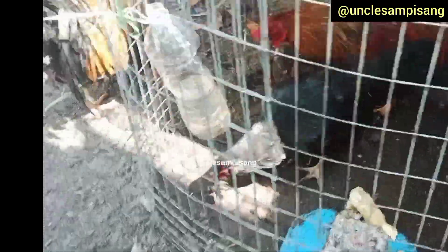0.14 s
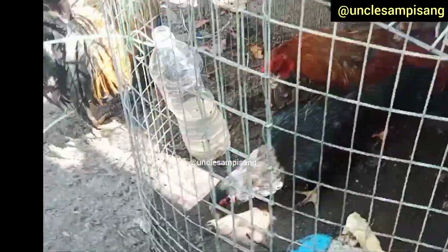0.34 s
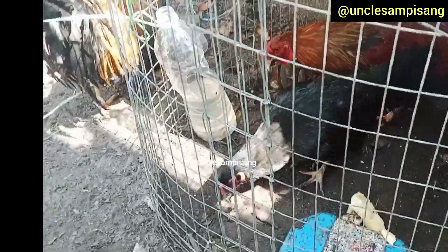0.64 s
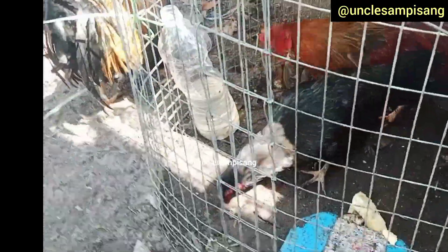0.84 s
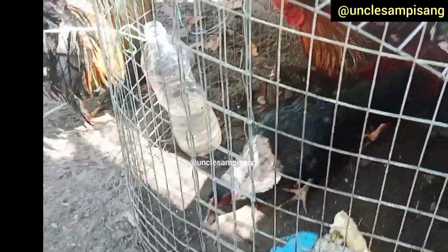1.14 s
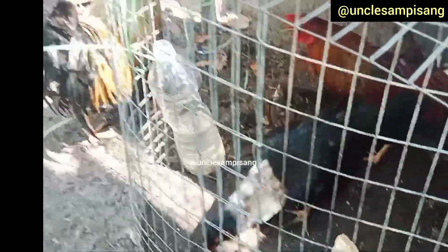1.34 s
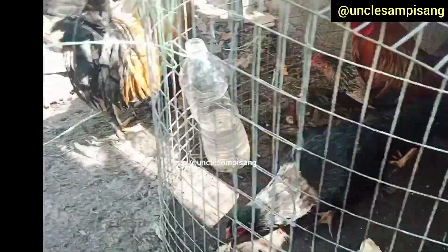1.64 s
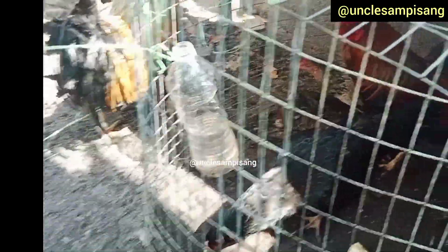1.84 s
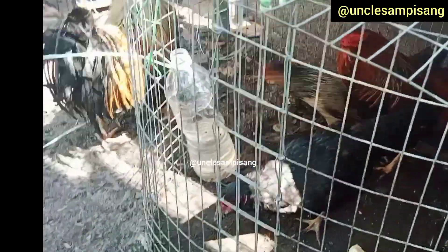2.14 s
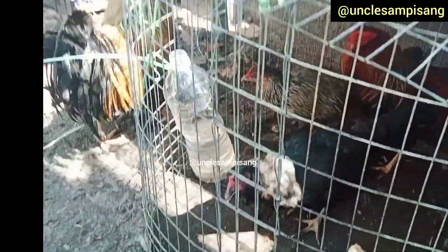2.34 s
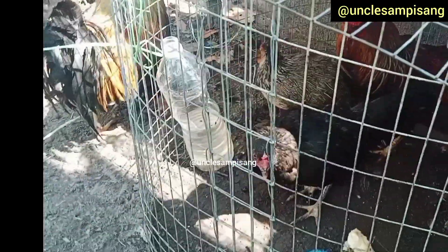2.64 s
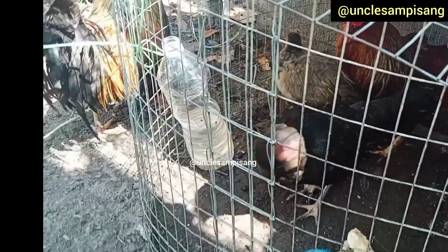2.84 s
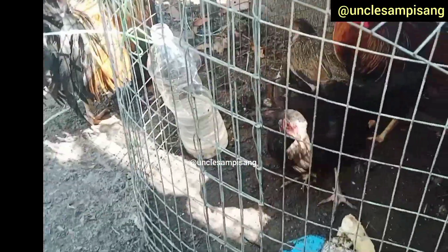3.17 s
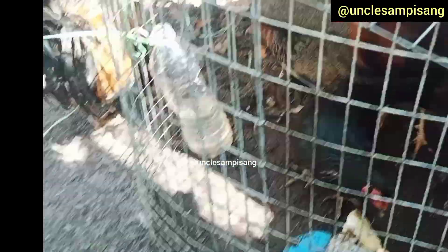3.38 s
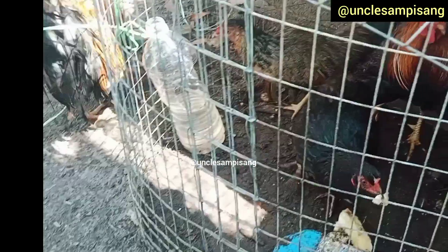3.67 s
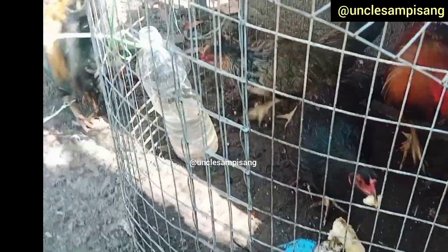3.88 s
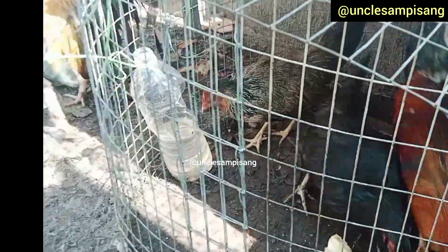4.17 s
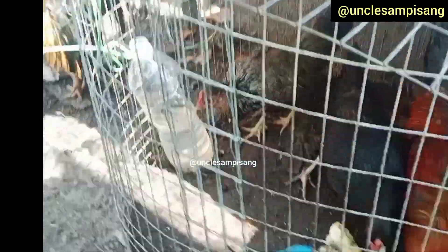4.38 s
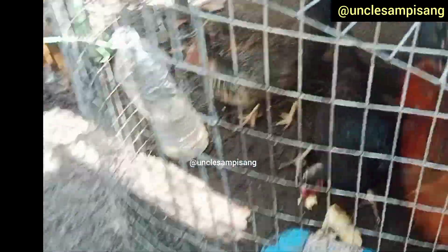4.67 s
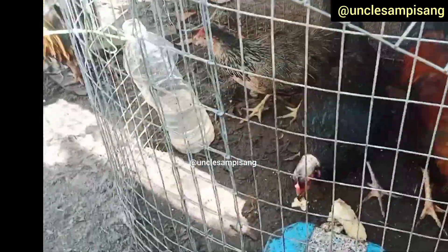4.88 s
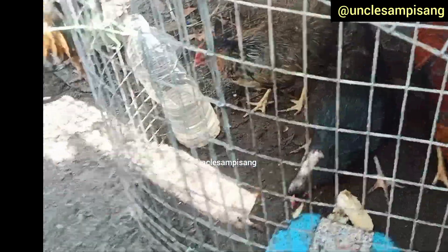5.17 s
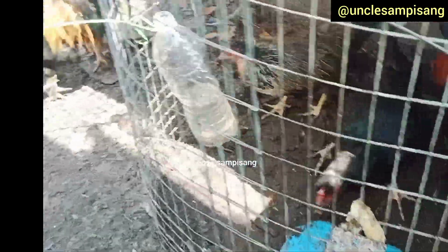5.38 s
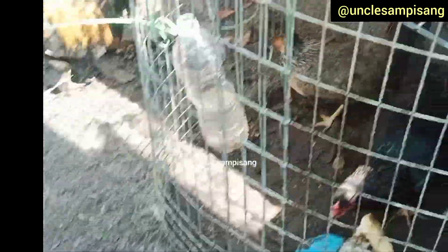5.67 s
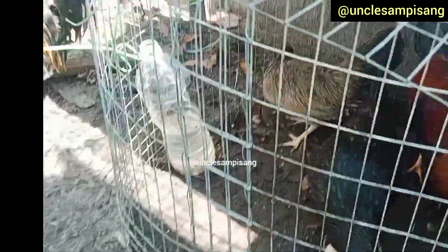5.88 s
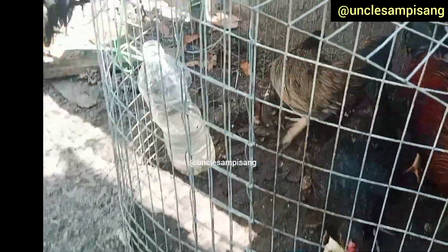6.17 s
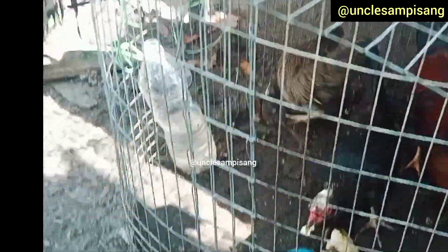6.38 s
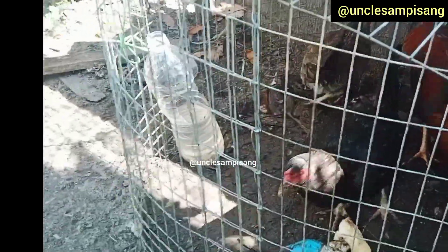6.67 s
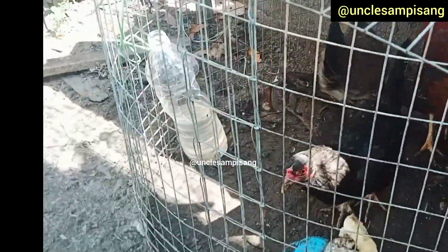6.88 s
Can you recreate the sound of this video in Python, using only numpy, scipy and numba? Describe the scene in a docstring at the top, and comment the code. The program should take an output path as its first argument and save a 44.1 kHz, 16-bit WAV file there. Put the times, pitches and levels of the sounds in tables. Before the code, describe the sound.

Quick, throaty rooster clucks come in runs with brief pauses, over light pecking and faint outdoor air.

```python
"""In a yard, a rooster clucks in quick runs inside a wire pen, about a metre away.
Each cluck comes from flapping membranes in his windpipe: it starts as a creak, tightens into a short
arch of pitch and rings in his throat, chest and beak. Beaks knock and tick on food and ground, feet stir
litter and grit, hens and far-off chicks call faintly, and at the end a chick peeps over a rustle.
The yard answers with a soft echo, over a faint hush of outdoor air."""
import sys
import numpy as np
from scipy import signal
from scipy.fft import rfft, irfft
from scipy.io import wavfile
from scipy.ndimage import uniform_filter1d, minimum_filter1d
from numba import njit

SR = 44100
rng = np.random.default_rng(int(sys.argv[2]) if len(sys.argv) > 2 else 0)


def digitize_waveform(pressure):
    """Quantize a signal to 16-bit integers and store it at the path in sys.argv[1].

    Rows of a 2-D input are taken as channels; values are limited to [-1, 1].
    """
    field = np.atleast_2d(pressure).T
    bounded = np.clip(field, -1, 1)
    quanta = np.round(bounded * 32767).astype(np.int16)
    wavfile.write(sys.argv[1], SR, quanta)


N = 309582

# birds' feet stirring the litter and scratching the grit: start_s, length_s, rustle_db, grit_db
FOOT_STIRS = [(-0.004, 0.9, -57.5, -70.5), (3.607, 0.37, -75, -82), (4.245, .3, -67, -71),
              (4.6, 0.99, -58, -72), (6.919, 0.42, -36.5, -68)]


def rooster(gain_db=-0.3, wall_delay_s=0.022, wall_db=-25):
    """Runs of clucks. Each bounces off ground and pen, differently as the head bobs, and off a wall."""
    # the clucks, timed from the start of their creak: start_s, creak_s, loud_s, pitch_hz, level_db
    clucks = [(.1, .012, 0.025, 419, -22.3), (.251, .011, 0.025, 508.3, -20),
              (0.419, 0.015, .03, 493.4, -22), (1.086, 0.0054, 0.032, 374, -23),
              (1.267, 0.0087, 0.028, 377.6, -23), (1.434, 0.0066, .026, 470, -21.7),
              (1.597, .007, 0.024, 404.8, -20), (1.748, 0.014, 0.023, 398, -20.5),
              (1.951, .014, 0.023, 477.5, -19), (2.117, .013, 0.026, 400.5, -16.5),
              (2.299, .012, 0.037, 526.5, -15.5), (2.49, 0.011, 0.035, 397.3, -19.5),
              (2.766, 0.013, 0.034, 486.3, -18), (2.921, .012, 0.034, 412, -18.5),
              (3.159, .007, 0.0286, 430.8, -26.5), (3.386, 0.0046, 0.03, 367.7, -39),
              (3.905, .01, 0.031, 360.5, -26), (4.059, 0.011, 0.026, 482, -18),
              (4.223, 0.008, 0.026, 538, -17), (4.371, 0.015, 0.028, 510.7, -17.5),
              (4.526, 0.0089, .03, 523.8, -17.5), (4.686, .012, 0.027, 509.2, -18),
              (4.879, .015, .034, 533, -19), (5.035, .014, 0.036, 533.8, -19.5),
              (5.255, .015, 0.035, 529.2, -17.5), (5.45, 0.01, 0.032, 541.7, -15.5),
              (5.683, 0.013, 0.02, 503, -16), (5.846, 0.015, 0.022, 525.3, -17),
              (6.013, 0.015, 0.032, 533.5, -20.3), (6.205, 0.019, 0.023, 529.3, -15.5),
              (6.478, .014, 0.027, 539, -19.5), (6.636, 0.012, 0.029, 501, -22.5),
              (6.8, 0.017, 0.023, 499.7, -15.5), (6.967, 0.016, .029, 495.8, -16)]
    # where the throat rings for a 500 Hz cluck, higher in the later runs: time_s, ring_hz
    throat_tuning = [(.3, 966), (2, 958), (3, 992), (4.05, 1001), (4.25, 1075), (7, 1051)]
    # the beak opens and closes, moving the pitches it rings at: time_s, pitch_factor
    beak_shifts = [(.3, 1.03), (1.3, 1.03), (2.1, .965), (2.95, .97), (3.2, 1.02), (4.55, .965),
                   (4.9, 1.06), (5.3, 1.01), (6.3, .98)]
    # treble and nasal ring compared with the throat: time_s, treble_db, nasal_db
    brightness = [(.1, -12, -20), (.25, -9.5, -8), (1.09, -8, -9.5), (1.3, -14.5, -9), (1.95, -7.5, -9.5),
                  (2.12, -16, -16.5), (2.5, -14, -11), (2.93, -16, -11), (3.39, -24.5, -26),
                  (3.91, -17.5, -21.5), (4.06, -10.5, -16.5), (4.37, -12.5, -13.5), (4.53, -8.5, -7.5),
                  (5.04, -8.5, -12), (5.45, -14.5, -17.5), (6.01, -18, -25.5), (6.64, -9, -35),
                  (6.97, -13, -32)]
    # dips and bumps in the tone of the voice: frequency_hz, gain_db
    voice_tone = [(530, 0.5), (620, 4), (760, 2), (1500, -3), (1700, -7.5), (2000, 1.5), (4800, -3.5),
                  (5300, -14.5), (7500, -10.5), (8200, -2.5), (9200, -1), (10000, -9.5), (13000, -9)]
    out = np.zeros(N)
    bounce_delays_s = rng.uniform([.001, .0025], [.0025, .0045], (len(clucks), 2))
    for (start_s, creak_s, loud_s, pitch_hz, level_db), delays_s in zip(clucks, bounce_delays_s):
        throat_hz = look_up(throat_tuning, start_s) * (pitch_hz / 500) ** 0.25  # rises with the pitch
        beak_shift = look_up(beak_shifts, start_s)
        treble_db, nasal_db = look_up(brightness, start_s), look_up(brightness, start_s, column=2)
        voice = cluck(creak_s, loud_s, pitch_hz, level_db, throat_hz, beak_shift, treble_db, nasal_db)
        begin_s = start_s - 2 / pitch_hz  # one slow flap of run-up
        add(out, begin_s, voice)
        bounce = colour(voice, [(1050, -24), (1600, -7), (9000, -6)])
        for delay_s in delays_s:
            add(out, begin_s + delay_s, bounce)
        add(out, begin_s + wall_delay_s, undb(wall_db) * voice)
    return undb(gain_db) * colour(out, voice_tone)


def cluck(creak_s, loud_s, pitch_hz, level_db, throat_hz, beak_shift, treble_db, nasal_db):
    """One cluck: tension lifts the pitch until its first overtone sits where the throat rings."""
    # soft clucks are hoarse, hard ones cleaner: level_db, roughness (0 to 1)
    hoarseness = [(-22.5, .62), (-17.5, .47), (-14.5, .25)]
    # a dip just above the throat's ring, which the nasal ring fills: frequency_hz, gain_db
    nasal_dip = [(1270, -0.5), (1500, -6), (2100, -0.5)]
    # where the chest rings: centre_hz, width_hz, gain_db
    chest_rings = [(212.5, 31.6, -3.5), (330.7, 107, 2.5), (401.2, 15, -8), (568, 72, 1)]
    # chest hum compared with the throat, weaker in hard clucks: level_db, chest_db
    chest_share = [(-27, -15.5), (-15, -21)]
    t = np.arange(SR // 10) / SR - 2 / pitch_hz
    progress = (t - creak_s) / loud_s  # below 0 the creak, 0 to 1 the loud part
    tension = np.interp(progress, [-0.3, 0.21, 0.4915, 1.1, 1.15], [0.02, .78, 1, 0.93, 1.0])
    # the effort jumps out of the creak, swells, holds, sags and is cut off
    effort = undb(np.interp(progress, [-.25, 0, .53, .69, 1.1], [-13, -3, 0, 0, -7])) * (progress < 1.1)
    effort *= undb(np.interp(t, [t[0], 0], [-28, 0]))  # the first flap is weak
    roughness = look_up(hoarseness, level_db)
    unrest = np.clip(roughness + 0.18 + 0.97 * (1 - tension), 0, 1)
    pulses, hiss = voice_box(pitch_hz * (.5 + .5 * tension), unrest)
    airflow = effort * (pulses + roughness * hiss)
    rasp = pulses + (0.27 + roughness) * hiss
    # the half-closed beak keeps the ring low in the creak, and opens with the tension
    centre_hz = throat_hz * (0.83 + 0.14 * tension)
    creak = resonate(airflow * (1 - tension), centre_hz, width_hz=390)
    tone = resonate(airflow * tension, centre_hz, width_hz=300)
    throat = colour(creak + tone, nasal_dip)
    chest = sum(undb(db) * resonate(airflow, hz, width_hz) for hz, width_hz, db in chest_rings)
    treble = beak_ring(rasp, effort, beak_shift * (1 + 0.072 * (tension - .92)), treble_db)
    nasal = resonate(effort ** 1.34 * rasp, 1335 * (throat_hz / 950) ** 0.53, width_hz=250)
    voice = unit(throat) + undb(look_up(chest_share, level_db)) * unit(chest)
    voice += undb(nasal_db) * unit(nasal) + undb(treble_db) * unit(treble)
    return undb(level_db) * np.sqrt(loud_s / t[-1]) * voice  # the root allows for the silent end


def voice_box(pitch_hz, unrest, jitter_cycles=0.1103, shimmer_db=2, limp_db=2.5, air=0.14, count=64):
    """Each membrane flap gives a pulse and a hiss. Unrest makes flaps uneven, strong and weak by turns."""
    n = len(pitch_hz)
    samples, flaps = np.arange(n), np.arange(count)
    cycles = np.cumsum(pitch_hz) / SR
    lateness, strength = rng.standard_normal((2, count))
    flap_unrest = np.interp(np.interp(flaps + 0.07, cycles, samples), samples, unrest)
    positions = np.interp(flaps + 0.2138 + jitter_cycles * flap_unrest * lateness, cycles, samples)
    sizes = undb(flap_unrest * (shimmer_db * strength + limp_db * (-1) ** flaps))
    # spread each pulse over 16 samples, so that its centre can fall between two
    nearby = positions.astype(int)[:, None] + np.arange(-7, 9)
    offset = nearby - positions[:, None]
    shapes = sizes[:, None] * np.sinc(offset) * np.sinc(offset / 8)
    pulses = np.bincount(np.maximum(nearby, 0).ravel(), shapes.ravel())[:n]
    hiss = air * np.exp(-(cycles % 1) / 1.2) * rng.standard_normal(n)
    return pulses, hiss


def beak_ring(rasp, effort, pitch_factor, treble_db, stray_share=0.04, stray_db=3):
    """Windpipe and beak ring high only under pressure; the beak's shape differs a little each time."""
    # where windpipe and beak ring: centre_hz, width_hz, gain_db
    rings = [(2039, 180, -4), (2386, 190, 2.5), (2845, 406, 3.5), (3420, 184, -4), (4227, 360, -10),
             (6400, 1000, -23.5), (8540, 590, -20), (14000, 2900, -40)]
    out = 0
    for (hz, width_hz, db), (hz_draw, db_draw) in zip(rings, rng.uniform(-1.05, 1, (len(rings), 2))):
        octaves = np.log2(hz / 2000)
        pressure = effort ** (1.34 + 0.21 * octaves)  # higher rings need more effort
        tilt_db = 0.27 * (treble_db + 12) * octaves  # dull clucks lose the top first
        centre_hz = hz * pitch_factor * (1 + stray_share * hz_draw)
        out += undb(db + tilt_db + stray_db * db_draw) * resonate(pressure * rasp, centre_hz, width_hz)
    return out


def feeding(attack_s=0.0013):
    """Pecks thud on packed earth as two fading tones; grit ticks as short bursts of noise."""
    # dull pecks on the ground: start_s, level_db, pitch_hz, decay_s
    pecks = [(3.068, -28.5, 353, 0.0061), (3.726, -58, 575, 0.0089), (5.523, -29.5, 570, 0.0045),
             (5.531, -28.5, 337, 0.0029)]
    # dry ticks of beak and claw on grit: start_s, level_db, centre_hz, decay_s
    ticks = [(.17, -50.5, 5000, 0.0013), (.347, -59, 5500, .0022), (0.831, -66.5, 4950, 0.0067),
             (1.355, -60, 12000, .0044), (1.394, -63, 10800, .0017), (3.067, -41, 1850, 0.0078),
             (3.351, -59.5, 1895, 0.031), (3.471, -50.5, 2030, .019), (3.478, -54, 9200, .0035),
             (4.131, -63.5, 10000, .002), (4.615, -68, 11100, .002), (5.09, -40, 9900, .0017),
             (6.418, -65, 3800, .006)]
    out, t = np.zeros(N), np.arange(SR // 10) / SR
    for start_s, db, hz, decay_s in pecks:
        thud = np.sin(2 * np.pi * hz * t) + 0.57 * np.sin(2 * np.pi * 1.6 * hz * t)
        envelope = np.exp(-t / decay_s) * (1 - np.exp(-t / attack_s))
        add(out, start_s, undb(db) * 2 * thud * envelope)
    for start_s, db, hz, decay_s in ticks:
        tick = unit(resonate(rng.standard_normal(len(t)), hz, 0.85 * hz))
        add(out, start_s, undb(db) * tick * np.exp(-t / decay_s))
    return out


def chick(top_s=6.937, rise_s=0.035, fall_s=0.081, start_hz=4160, top_hz=6550, end_hz=4150):
    """A chick's peep: a whistle that leaps up and slides down."""
    t = np.arange(N) / SR - top_s
    rising_hz = start_hz + (top_hz - start_hz) * np.exp(-(t / 0.015) ** 2)
    falling_hz = end_hz + (top_hz - end_hz) * np.exp(-np.abs(t) / 0.024)
    pitch_hz = np.where(t < 0, rising_hz, falling_hz) * (1 + 0.011 * wander(140))
    fade_in, fade_out = (t + rise_s) / 0.0066, (fall_s - t) / 0.021
    envelope = np.clip(np.minimum(fade_in, fade_out), 0, 1)
    return envelope * np.sin(2 * np.pi * np.cumsum(pitch_hz) / SR)


def rustle(flicker_db=3):
    """Feathers and dry litter crackle as the birds stir."""
    # tone of the rustle: frequency_hz, gain_db
    litter_tone = [(40, -10.5), (150, 3.5), (400, -4), (1000, 2), (2500, -10.5), (5000, -22), (7200, -27),
                   (8800, -12), (11000, -29.5), (15500, -28)]
    strength = sum(undb(db) * stir(start_s, length_s) for start_s, length_s, db, _ in FOOT_STIRS)
    grains = rng.standard_normal(N) * undb(flicker_db * wander(210))
    return strength * unit(colour(grains, litter_tone))


def scratching(flicker_db=5, crumbs_per_s=60, crumb_db=-3):
    """Fine grit crackles under the claws in uneven spurts, with a few coarser crumbs."""
    strength = sum(undb(db) * stir(start_s, length_s) for start_s, length_s, _, db in FOOT_STIRS)
    grains = rng.standard_normal(N) * undb(flicker_db * wander(140) + 2.5 * wander(19))
    crumbs = (rng.random(N) < crumbs_per_s / SR) * rng.standard_normal(N)
    grit = unit(grains) + undb(crumb_db) * unit(crumbs)
    bright_grit = colour(grit, [(2000, -8), (6000, 1.5), (9000, 11.5), (11000, -3.5), (15500, 2)])
    return strength * unit(bright_grit)


def stir(start_s, length_s, attack_s=.115, release_s=0.09):
    """Strength of one stir of the feet: it builds quickly, fades and stops."""
    times_s = start_s + np.array([-attack_s, 0, length_s, length_s + release_s])
    levels_db = [-24.5, 0, -17, -24.5]
    return undb(np.interp(np.arange(N) / SR, times_s, levels_db, left=-np.inf, right=-np.inf))


def hens(overtone_db=-15):
    """Hens coo in nearly pure, slightly wavering tones."""
    # soft calls: start_s, length_s, start_hz, end_hz, level_db
    coos = [(0.308, 0.045, 247, 357, -46), (0.385, 0.15, 565, 547, -45), (0.521, 0.09, 540, 578, -43.5),
            (3.151, 0.041, 268, 310, -42), (3.228, 0.081, 314, 312, -75)]
    out = np.zeros(N)
    for start_s, length_s, start_hz, end_hz, db in coos:
        n = int(length_s * SR)
        pitch_hz = np.linspace(start_hz, end_hz, n) * (1 + 0.01 * wander(90)[:n])
        phase = 2 * np.pi * np.cumsum(pitch_hz) / SR
        tone = np.sin(phase) + undb(overtone_db) * np.sin(2 * phase)
        add(out, start_s, undb(db) * np.sqrt(np.hanning(n)) * tone)
    return out


def far_chicks(arch=0.22, warble=.012, flicker_db=4, harmonics_db=(-8, -5, 0, -6)):
    """Chicks further off whistle long thin cheeps that rise, warble and sink, flickering in level."""
    # faint cheeps: start_s, length_s, top_pitch_hz, relative_level_db
    cheeps = [(0.954, 0.52, 2820, -75), (3.04, 0.27, 2420, -73), (4.987, 0.49, 2720, -72)]
    out = np.zeros(N)
    for start_s, length_s, top_hz, db in cheeps:
        n = int(length_s * SR)
        pitch_hz = top_hz * (1 - arch * np.linspace(-1, 1, n) ** 2) * (1 + warble * wander(140)[:n])
        phase = 2 * np.pi * np.cumsum(pitch_hz) / SR
        tone = sum(undb(db + harmonic_db + flicker_db * wander(30)[:n]) * np.sin(k * phase)
                   for k, harmonic_db in enumerate(harmonics_db, 1))
        add(out, start_s, np.hanning(n) ** 0.41 * tone)
    return out


def yard_echo(sound, near_db=-15, near_decay_s=0.01, tail_db=-19, build_s=0.023, moves_per_s=5):
    """Quick scatter from ground and pen, then a soft tail from the walls; paths shift as birds move."""
    # bands of the echo's tail: centre_hz, level_db, fade_s (time to fall by 60 dB)
    bands = [(263, 8, 0.26), (563, -6, 0.27), (1000, -7, 0.17), (2160, -3.5, 0.3), (3500, 2.5, 0.21),
             (8100, 3, 0.17)]
    t = np.arange(SR // 2) / SR
    shares = np.array([wander(moves_per_s) for _ in range(5)])  # a drifting blend of five echoes
    out = 0
    for share in shares / np.linalg.norm(shares, axis=0):
        tail = sum(undb(db) * resonate(rng.standard_normal(len(t)), hz, hz) * undb(-60 * t / fade_s)
                   for hz, db, fade_s in bands)
        tail *= 1 - np.exp(-(t / build_s) ** 2)
        near = rng.standard_normal(len(t)) * np.exp(-t / near_decay_s) * (t > .002)
        echo = (undb(near_db) * unit(near) + undb(tail_db) * unit(tail)) / np.sqrt(len(t))
        out += signal.fftconvolve(sound * share, echo)[:N]
    return out


def outdoor_air(level_db=-62.5):
    """A faint hush of outdoor air that wavers a little in level."""
    # tone of the air: frequency_hz, gain_db
    air_tone = [(25, -11), (45, -6), (70, -1.5), (130, -6.5), (300, -7.5), (500, -13), (950, -19.5),
                (1400, -19), (3000, -22.5), (4500, -30.5), (7000, -48.5), (8800, -31), (10500, -49.5),
                (15500, -49.5)]
    hush = unit(colour(rng.standard_normal(N), air_tone))
    return hush * undb(level_db + wander(6.7) + 0.31 * wander(13))


def undb(db):
    """Turn decibels into a gain."""
    return 10 ** (np.asarray(db) / 20)


def unit(x):
    """Scale to an average (rms) level of 1."""
    return x / np.sqrt(np.mean(x ** 2) + 1e-20)


def add(out, start_s, x):
    """Mix x into out from start_s on."""
    i = max(int(start_s * SR), 0)
    out[i:i + len(x)] += x[:max(len(out) - i, 0)]


def look_up(table, at, column=1):
    """Read between a table's rows, going by its first column."""
    columns = np.transpose(table)
    return np.interp(at, columns[0], columns[column])


@njit
def band_pass(x, centre_hz, width_hz):
    """Keep a band around a moving centre, with gain 1 there (a state-variable filter)."""
    out, band, low = np.empty(len(x)), 0., 0.
    for i in range(len(x)):
        step, damping = np.tan(np.pi * centre_hz[i] / SR), width_hz / centre_hz[i]
        swing = (band + step * (x[i] + 1e-18 - low)) / (1 + step * (step + damping))
        band, low = 2 * swing - band, low + 2 * step * swing
        out[i] = damping * swing
    return out


def resonate(x, centre_hz, width_hz):
    """Make x ring around centre_hz, filtering twice for steep sides."""
    centre_hz = np.minimum(centre_hz + np.zeros(len(x)), .45 * SR)
    once = band_pass(x, centre_hz, float(width_hz))
    return band_pass(once, centre_hz, float(width_hz))


def colour(x, points):
    """Shape the tone by (frequency_hz, gain_db) points."""
    hz, db = np.transpose(points)
    bins_hz = np.maximum(np.fft.rfftfreq(len(x), 1 / SR), 1)
    return irfft(rfft(x) * undb(np.interp(np.log(bins_hz), np.log(hz), db)), len(x))


def wander(steps_per_s):
    """Random drift with a spread near 1; it holds still after 1024 steps."""
    steps = rng.standard_normal(1024)
    return np.interp(np.arange(N) / SR * steps_per_s, np.arange(len(steps)), steps)


def scene(peep_db=-38.5, cheep_gain_db=-12):
    """The rooster, pecks and feet are close; the other birds are further off and carry more echo."""
    close = rooster() + feeding() + rustle() + scratching()
    coos, peep, cheeps = hens(), chick(), far_chicks()
    direct = close + coos + undb(peep_db) * peep + undb(cheep_gain_db) * cheeps
    into_echo = close + undb(10) * coos + undb(-21.5) * peep + undb(5) * cheeps
    return (direct + yard_echo(into_echo) + outdoor_air())[None]


def record(dry, ceiling=.36, ease_samples=260, top_hz=15750):
    """Ease the level down for a few milliseconds on peaks above the ceiling, and cut the top treble."""
    needed_gain = np.minimum(ceiling / (np.abs(dry) + 1e-9), 1)
    smooth_gain = uniform_filter1d(minimum_filter1d(needed_gain, ease_samples), ease_samples)
    low_pass = signal.ellip(10, .2, 80, top_hz, fs=SR, output="sos")
    return signal.sosfilt(low_pass, dry * smooth_gain)


dry = scene()
out = record(dry)
digitize_waveform(out)
```